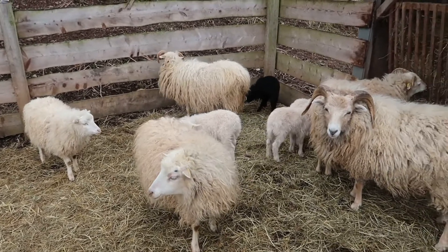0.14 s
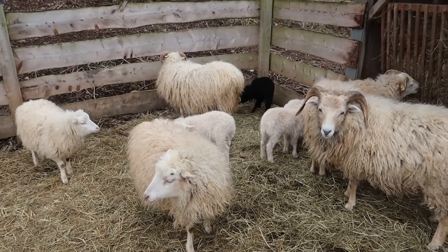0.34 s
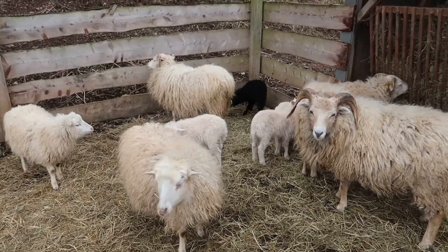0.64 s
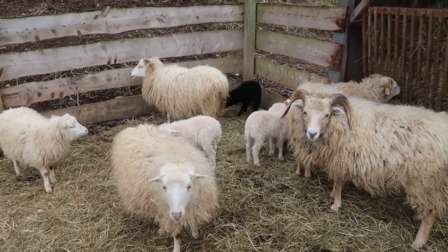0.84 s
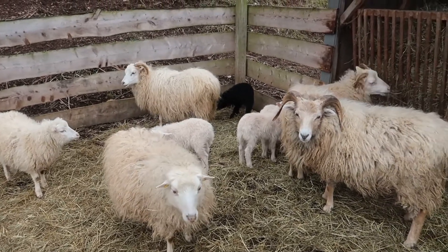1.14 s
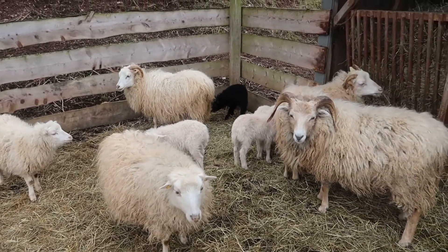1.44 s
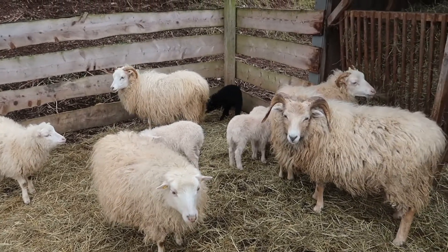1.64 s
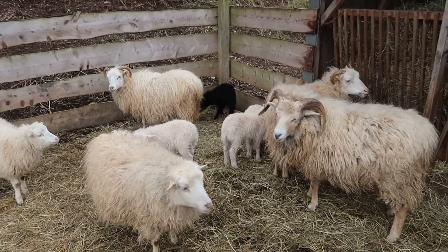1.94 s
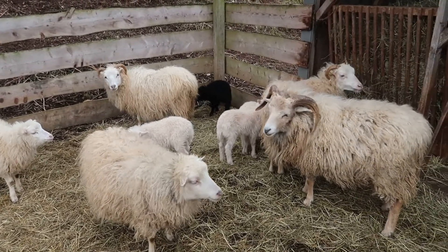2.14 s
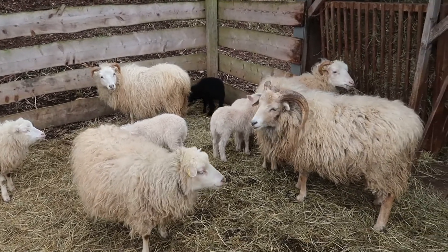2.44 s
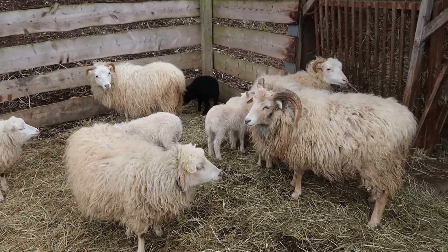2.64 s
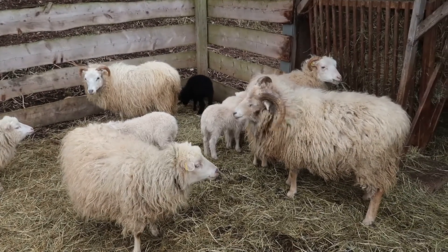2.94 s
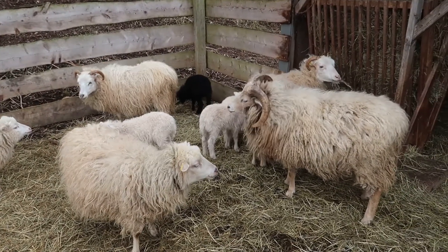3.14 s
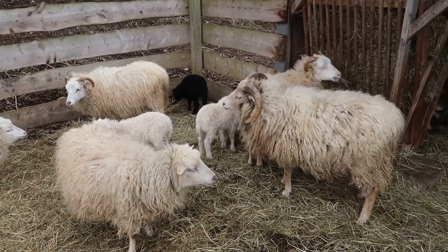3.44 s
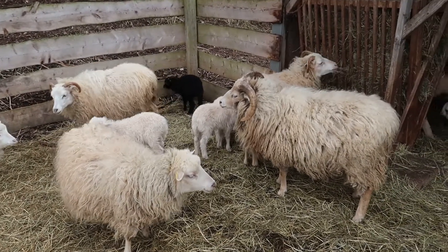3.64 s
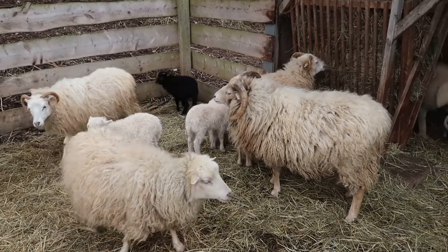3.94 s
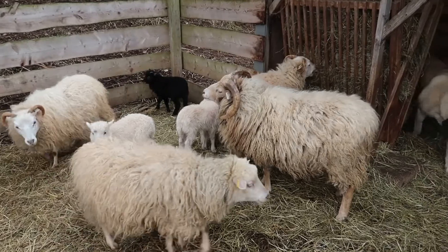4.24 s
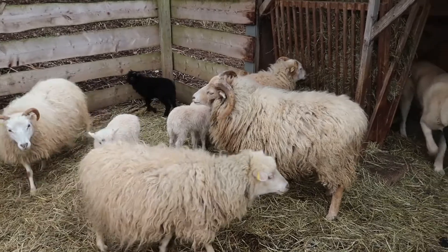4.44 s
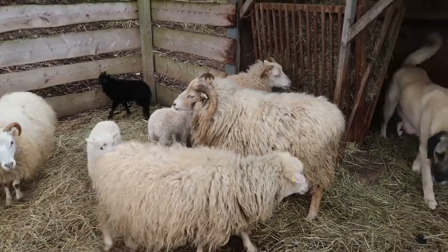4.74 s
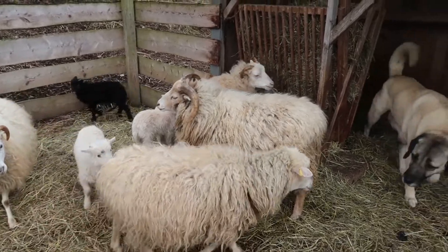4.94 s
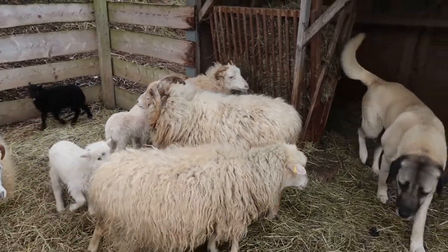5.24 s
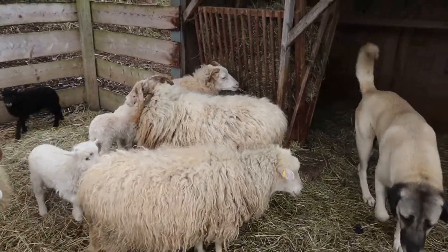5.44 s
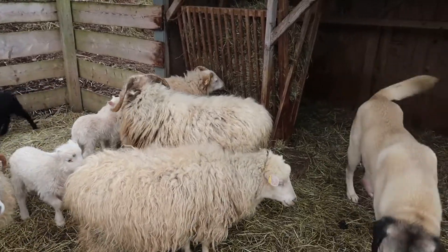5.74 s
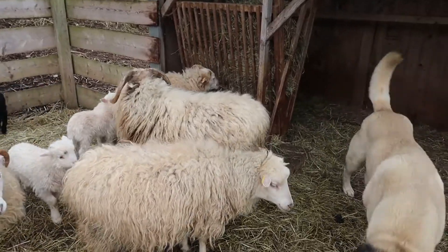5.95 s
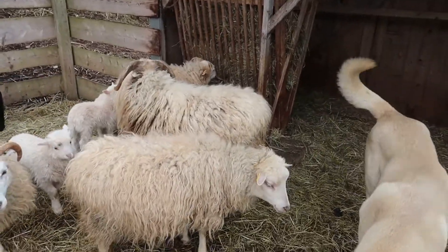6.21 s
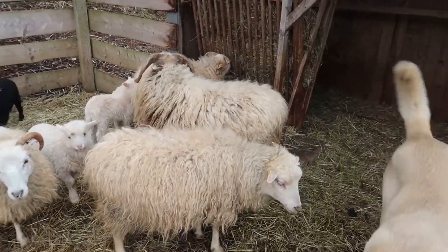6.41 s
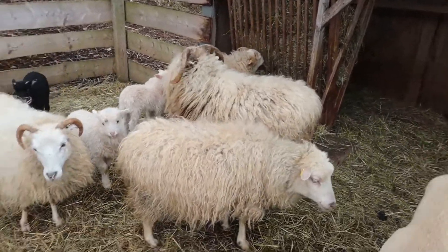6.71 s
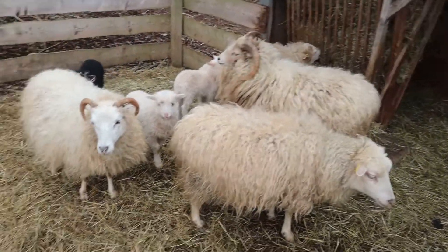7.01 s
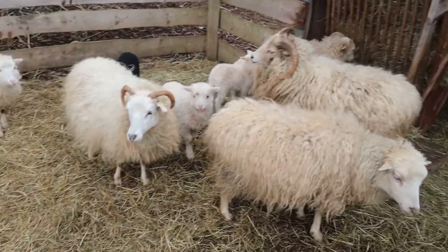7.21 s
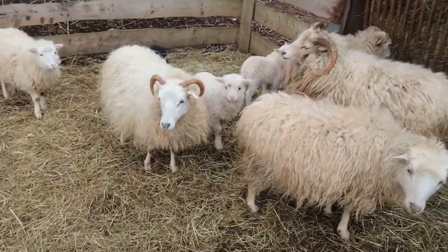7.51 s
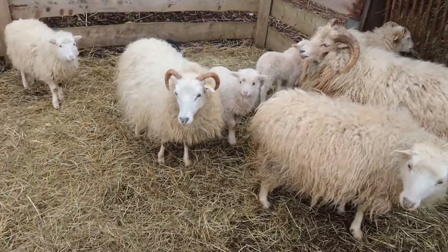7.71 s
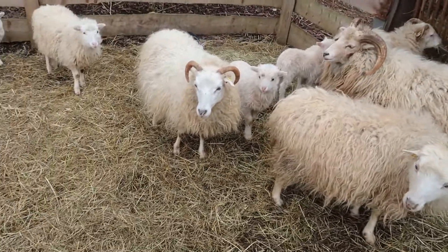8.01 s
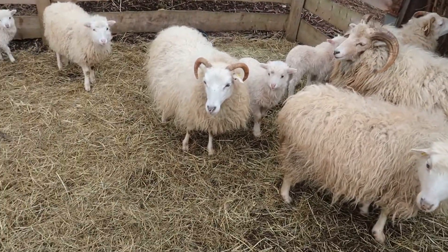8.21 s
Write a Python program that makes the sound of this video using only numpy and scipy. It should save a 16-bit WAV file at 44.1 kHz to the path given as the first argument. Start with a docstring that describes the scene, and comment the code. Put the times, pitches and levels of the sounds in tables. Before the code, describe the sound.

Quiet open-air farm ambience with twittering birds echoing from trees and faint, blurred sheep bleats far off. Straw crackles under shifting feet, more strongly in the second half. Soft short grunts come close together before the middle, then dull taps on planks. Near the end one sharp, very loud wooden knock strikes, then a rattling scrape and several smaller knocks. Stereo phone-like pickup near the flock, slight shed reflection.

```python
"""A plank sheep pen, heard through a phone's two microphone ports a few metres from the flock.
From the start: outdoor air and low rumble (shaped noise), straw rustle (spiky noise), chirps (gliding sines).
From 0.8 s birds whistle bent syllables from the trees and far bleats (filtered pulses) return as echoes;
from 1.4 s hooves knock the boards (ringing modes, scraping noise); near 3.5 s a ewe grunts softly (harmonics).
Song comes again from 6.2 s, and the hardest knock falls at 7.6 s."""
import sys
import numpy as np
from scipy import signal
from scipy.fft import rfft, irfft
from scipy.io import wavfile
from scipy.ndimage import uniform_filter1d

SR = 44100
rng = np.random.default_rng(int(sys.argv[2]) if len(sys.argv) > 2 else 0)


def unload_audio(sound):
    """Save the sound as a 16-bit wav file, at the path given as the first command line argument."""
    columns = np.transpose(np.atleast_2d(sound))
    # keep every value between -1 and 1, then stretch to whole-number steps
    steps = np.round(np.clip(columns, -1, 1) * 32767)
    wavfile.write(sys.argv[1], SR, steps.astype(np.int16))


def invert_db(level):
    """Linear amplitude ratio for a level in decibels (20 dB per decade), elementwise."""
    return 10 ** (np.asarray(level, dtype=float) / 20)


N = 369097
T = np.arange(N) / SR
LR = np.array([[1], [-1]])  # opposite signs, left and right

# outdoor air, middle of the image, relative spectrum: f/Hz, density/dB
AIR_SPECTRUM = [(15, -60), (25, -25), (53, -7), (118, -4.5), (142, -2.5), (257, -1), (427, -9), (475, -11),
                (1060, -15), (1500, -16.5), (1760, -18.5), (3540, -20), (11500, -35), (15000, -44)]
# outdoor air, side against middle: f/Hz, side minus mid/dB
AIR_WIDTH = [(60, -31), (110, -18.5), (200, -19.5), (380, -3.5), (700, -1.5), (1290, 0.5), (2380, 0.5),
             (4400, 2), (8120, 4.5), (15000, 13)]
# wind on the microphone: t/s, level/dB
WIND = [(0, -72), (.6, -62), (1.05, -64), (1.3, -61.5), (3.5, -71), (5, -71.5), (5.5, -60), (5.9, -50.5),
        (6.08, -54.5), (6.34, -52), (6.8, -54), (7.5, -52), (8.25, -51), (8.37, -46.5)]
# low rumble, relative spectrum: f/Hz, density/dB
RUMBLE_SPECTRUM = [(20, -51), (32, 4.5), (42, 6.5), (70, 8.5), (100, 2.5), (200, 1.0), (500, -57.0)]
# crisp stalks, relative spectrum: f/Hz, density/dB
STALKS = [(3000, -15), (5000, 0), (7000, 0), (11500, 0.5), (14000, -6), (15600, -11)]
# trodden bedding, relative spectrum: f/Hz, density/dB
BEDDING = [(700, -1.5), (1500, -4.5), (2500, -1.5), (4500, -3.5), (7000, -28.5)]
# general stir of the flock: t/s, relative shuffle level/dB, crispness (stalks above shuffle)/dB
STIR = [(0, -73.5, -7), (1.1, -68, -8.5), (2, -87, 6), (3.4, -69, -6.5), (4, -58.5, 0.5), (5.3, -63, 0.5),
        (5.8, -60, 1), (6.1, -63.5, 0), (6.9, -61, -19), (7.4, -53.5, -7), (7.7, -63.5, -11),
        (8.37, -58.5, -12)]
# single steps in the straw: t/s, relative level/dB, fade/s, crispness/dB
STEPS = [(1.05, -63, 0.093, 2), (2.03, -79.5, 0.074, 12.5), (2.54, -71, 0.15, 6.5),
         (3.5, -59.5, 0.023, 0.5), (3.68, -59.5, 0.061, -1), (3.94, -57.5, 0.024, 10), (4.54, -60, 0.22, 7),
         (4.99, -62, 0.12, 10), (5.6, -72, 0.11, -4), (5.97, -55, 0.026, 4.5), (6.29, -62, 0.072, 4),
         (6.64, -69, 0.018, 8), (6.81, -70.5, 0.084, 7.5), (7.22, -55.5, 0.05, -4), (7.53, -47, 0.059, -30),
         (7.58, -58, 0.024, 4.5), (7.74, -55.5, 0.095, -5), (8.062, -62, 0.02, 8), (8.248, -54, 0.027, 1)]
# short single chirps, among them lead-in and linking notes of the songs:
# t/s, level/dB, start f/Hz, end f/Hz, length/s
CHIRPS = [(.0, -51, 3080, 4320, 0.021), (0.116, -52.5, 3690, 3200, 0.023),
          (0.157, -56.5, 3080, 2400, 0.027), (.035, -56, 4700, 4070, 0.044), (.072, -55, 3190, 3550, 0.027),
          (0.225, -59, 4800, 5980, .05), (0.401, -54.5, 4040, 4500, 0.028), (.428, -55, 4550, 3400, .022),
          (.45, -53, 3350, 3800, 0.014), (0.544, -56.5, 5600, 6500, 0.028),
          (0.61, -54.5, 3600, 5600, 0.041), (0.663, -51, 5680, 6500, 0.018),
          (0.829, -50, 5940, 5300, 0.019), (.912, -49, 5650, 5260, .011), (.989, -49, 5900, 5300, 0.016),
          (.862, -51, 4680, 4000, .006), (1.106, -56, 5800, 5700, 0.014), (3.5, -58, 4100, 3900, .02),
          (3.749, -60, 4350, 4460, .028), (3.782, -55, 3900, 3750, .02), (3.915, -52, 3900, 4050, .016),
          (4.094, -56, 3050, 3200, 0.014), (7.38, -48, 3000, 2450, .02), (7.553, -44, 3660, 3500, .01),
          (0.676, -50, 4810, 4350, 0.024), (.768, -51, 3700, 5000, 0.016), (0.703, -52, 2750, 3050, 0.009),
          (0.748, -51.5, 3370, 2760, 0.036), (0.76, -52, 6100, 5300, 0.02),
          (1.017, -48.5, 3150, 3900, 0.015), (.74, -60, 4900, 4600, .02), (1.08, -50, 4310, 3930, 0.023),
          (1.095, -56, 4040, 3550, .01), (1.58, -57, 4620, 3110, 0.061), (1.616, -54, 3070, 3600, 0.015),
          (2.506, -56, 4560, 3950, 0.037), (3.16, -57, 2970, 2310, .031), (4.15, -54, 5900, 3970, 0.023),
          (4.288, -48, 5300, 3900, 0.0162), (4.359, -52.5, 4900, 3420, 0.032),
          (4.748, -47, 3900, 2600, 0.02), (4.772, -52, 3720, 2810, 0.019), (4.793, -51, 2240, 2300, .015),
          (4.86, -51, 3020, 4640, .022), (4.877, -49, 4600, 3720, 0.024), (4.939, -50, 3560, 3150, 0.027),
          (6.45, -47.5, 5250, 5170, 0.022), (6.492, -50, 5240, 5200, .03), (6.542, -51, 5580, 5400, 0.042),
          (7.2, -46.5, 4540, 4470, 0.024), (7.256, -50, 4510, 5330, 0.043), (7.277, -45, 3300, 2750, 0.013),
          (7.289, -48, 3700, 3550, 0.018), (7.38, -52, 3310, 2440, 0.033), (7.41, -63, 3260, 2330, .035),
          (7.4, -51, 4200, 3700, .02), (7.462, -50, 2900, 2400, .02), (7.493, -48.5, 4400, 4600, 0.016),
          (7.522, -46, 3800, 2710, .039), (7.538, -50, 4570, 4450, 0.024)]

# rising tick, shape: t/s, f/Hz, level/dB
TICK = [(0, 5250, -4), (.01, 5440, 0), (.022, 5750, -5)]
# when it is sung: t/s, level/dB, pitch factor
TICK_TIMES = [(2.614, -57, 1.06), (2.78, -51, 1.02), (2.932, -49.5, 1), (3.08, -50, 1.02),
              (3.222, -50, 0.95), (3.367, -50, 1.05)]
# arch, up and down, shape: t/s, f/Hz, level/dB
ARCH = [(0, 3700, -8), (.012, 4400, -4), (.022, 6150, -9), (.032, 4250, -6), (.042, 3700, -1),
        (.06, 3350, 0), (.08, 3200, -8)]
# when it is sung: t/s, level/dB, pitch factor
ARCH_TIMES = [(2.638, -50, 1.06), (2.799, -48, 1.07), (2.949, -46, 1.02), (3.096, -46, 0.96),
              (3.24, -41.5, .98), (3.379, -43.5, 0.94)]
# trill note, shape: t/s, f/Hz, level/dB
TRILL = [(0, 3150, 0), (.008, 2650, -5), (.018, 2100, -13), (.022, 2400, -20), (.024, 2900, -5),
         (.027, 3250, 0), (.038, 3450, -4), (.043, 3350, -18), (.049, 3300, -1), (.058, 3200, -12)]
# when it is sung: t/s, level/dB, pitch factor
TRILL_TIMES = [(3.485, -43, 0.96), (3.556, -43, 0.99), (3.631, -42, 0.98), (3.702, -42, 0.95),
               (3.778, -41.5, 0.96), (3.853, -44.5, 0.97)]
# broken falling note, shape: t/s, f/Hz, level/dB
FALL = [(0, 5450, -12), (.01, 4800, -2), (.02, 3380, -8), (.025, 2990, -20), (.029, 3490, -3),
        (.048, 2846, -5.5), (.056, 2400, -22), (.07, 2806, -6), (.078, 3030, -12), (.082, 4080, -3),
        (.1, 2800, -10.5), (.14, 2080, -17)]
# when it is sung: t/s, level/dB, pitch factor
FALL_TIMES = [(3.943, -37, 1)]
# hooked note, shape: t/s, f/Hz, level/dB
HOOK = [(0, 2050, -12), (.012, 2650, -9), (.022, 3250, 0), (.032, 2900, -4), (.036, 2900, -22),
        (.042, 3100, -8), (.052, 2900, -14)]
# when it is sung: t/s, level/dB, pitch factor
HOOK_TIMES = [(4.197, -40.5, 0.96), (4.32, -40, 0.96)]
# note that rises and drops back, shape: t/s, f/Hz, level/dB
RISE = [(0, 3750, -14), (.007, 4150, -7), (.011, 4500, 0), (.015, 5300, -6), (.017, 5500, -30),
        (.021, 5100, -11), (.026, 4500, -6), (.03, 4400, -14)]
# when it is sung: t/s, level/dB, pitch factor
RISE_TIMES = [(0.841, -45.5, 0.93), (.917, -44.5, .9), (.999, -44.5, 0.93), (1.158, -47, 0.96),
              (6.234, -38, 1), (6.31, -40, 1.04), (6.385, -42, 1.02), (6.467, -38.5, 0.99),
              (6.545, -42, 1.06)]
# V-shaped note, down and up, shape: t/s, f/Hz, level/dB
VEE = [(0, 5600, -10), (.012, 5250, -11), (.016, 4800, -18), (.019, 4350, -4), (.031, 3650, -1),
       (.045, 3200, 0), (.05, 3050, -20), (.057, 3500, -22), (.061, 3850, 0), (.067, 4350, -2),
       (.076, 5200, -15)]
# when it is sung: t/s, level/dB, pitch factor, length factor
VEE_TIMES = [(1.238, -44, 1, 0.65), (1.363, -45, 1, 0.67), (1.499, -45.5, 1, 0.59),
             (6.611, -41, 1.02, 0.93), (6.749, -38.5, 1.015, 0.77), (6.869, -40, 1.03, 0.83),
             (6.998, -40, 1.02, .8), (7.122, -41.5, 1.03, 0.6), (7.245, -48.5, 1.03, .72)]

# far bleats: t/s, length before the release/s, level/dB
FAR_BLEATS = [(0.865, 0.57, -61), (2.2, 0.4, -63.5), (3.518, 0.39, -60.5), (6.072, 0.42, -59)]
# ringing modes of a plank: f/Hz, level/dB, t60/s
PLANK = [(103.5, -12.5, 0.36), (181, -16.5, 0.14), (240, -17.5, 0.2), (279.3, -21.5, 0.24),
         (340, -12, 0.08), (398, -14, 0.08), (449.7, -9, 0.12), (662, -9, 0.057), (833, -17, 0.07),
         (1040, -19, 0.061), (1346, -21.5, 0.054), (1544, -19.5, 0.046)]
# knocks on the planks: t/s, blow level/dB, struck spot f/Hz, spot level/dB
KNOCKS = [(1.364, -41, 157, -65), (3.721, -41, 463, -39), (5.444, -52, 217, -43.5), (5.638, -46, 193, -46),
          (5.76, -47, 153, -52), (5.85, -41, 240, -53), (5.92, -36.5, 130, -43.5), (5.955, -42, 140, -45),
          (6.015, -42, 130, -44), (6.134, -37, 300, -45), (6.402, -34, 300, -53), (6.446, -49, 516, -42),
          (7.312, -35, 1220, -40), (7.568, -42, 520, -31), (7.6235, -8.5, 562, -12.5),
          (7.6345, -32, 480, -21), (7.647, -15, 378, -25), (7.664, -32, 480, -30), (7.684, -27, 169, -31.5),
          (7.77, -49, 790, -45), (7.845, -40, 1275, -36), (8.103, -27.5, 111, -25.5),
          (8.134, -41, 525, -21.5), (8.147, -21.5, 323, -23.5), (8.155, -24, 186, -26.5),
          (8.166, -21.5, 307, -25), (8.182, -30, 250, -36), (8.214, -53, 384, -40)]
# hooves scraping along the planks: t/s, fade after the peak/s, relative level/dB
SCRAPES = [(6.128, 0.021, -47), (6.446, 0.014, -48), (7.313, 0.02, -39), (7.567, 0.012, -33.5),
           (7.623, 0.024, -34.5), (7.645, 0.052, -41), (7.849, 0.0022, -33), (8.104, 0.017, -48),
           (8.141, 0.039, -22), (8.209, 0.043, -34.5)]
# crunch of a scrape: f/Hz, gain/dB
CRUNCH = [(60, -44), (150, 17.0), (500, 5.0), (1000, 1), (2200, 1.0), (3400, -14), (7000, -19), (12000, -65)]
# soft grunts of a ewe: t/s, length/s, pitch at full effort f/Hz, level/dB, mouth resonance f/Hz
GRUNTS = [(3.498, 0.021, 268, -41.5, 270), (3.6, 0.038, 238, -39, 483), (3.683, 0.04, 255.6, -34.5, 520),
          (3.808, 0.027, 217, -48, 240)]
# throat resonances: f/Hz, half-width/Hz, level against the mouth/dB
THROAT = [(760, 130, -41), (1515, 240, -35), (1780, 63, -19)]


def level(x, db):
    """Scale to an rms level."""
    return x * invert_db(db) / np.sqrt(np.mean(x ** 2))


def colour(x, points):
    """Shape a spectrum by (f/Hz, gain/dB) points, joined along log frequency."""
    hz, db = np.transpose(points)
    length = x.shape[-1]
    f = np.maximum(np.arange(length // 2 + 1) * SR / length, 1)
    gain = invert_db(np.interp(np.log(f), np.log(hz), db))
    return irfft(rfft(x) * gain, length)


def band(x, hz, width_hz):
    """One resonance, gain 1 at its centre."""
    return signal.lfilter(*signal.iirpeak(hz, hz / width_hz, SR), x)


def walk(rate):
    """Random levels held 1 / rate s and slewed twice; spread near 1."""
    k = int(SR / rate)
    held = np.repeat(rng.standard_normal(N // k + 1), k)
    return 0.82 * uniform_filter1d(uniform_filter1d(held, k), k)[:N]


def add(out, s, x):
    """Mix x in from time s."""
    i = int(s * SR)
    out[i:i + len(x)] += x[:N - i]


def ports(x, lag_s):
    """The two microphone ports hear a source from the side a little apart: left lags right by lag_s."""
    f = np.arange(N // 2 + 1) * SR / N
    turn = np.exp(-1j * np.pi * f * lag_s * LR)
    return irfft(rfft(x) * turn, N)


def echoes(x, t60_s, gap_s, patchy_db=0.):
    """A diffuse tail, unrelated in the two channels, with the energy of the direct sound."""
    t = T[:SR // 2]
    tail = rng.standard_normal((2, len(t))) * invert_db(-60 * t / t60_s) * (t > gap_s)
    # trunks and walls stand out as single reflections
    tail *= invert_db(patchy_db * rng.exponential(size=tail.shape))
    tail /= np.sqrt(np.sum(tail ** 2, 1, keepdims=True))
    return signal.fftconvolve(x[None], tail, axes=1)[:, :N]


def air():
    """Outdoor wash whose bass and treble flicker separately; the bass is alike left and right."""
    mid, side = colour(rng.standard_normal((2, N)), AIR_SPECTRUM)
    both = level(mid + colour(side, AIR_WIDTH) * LR, -52)
    low = signal.sosfiltfilt(signal.butter(2, 500, fs=SR, output="sos"), both)
    high = both - low
    return low * invert_db(2.0 * walk(14)) + high * invert_db(1.8 * walk(6.5))


def rumble():
    """Wind and trampling shake the bass: low noise whose level follows the gusts."""
    gust_db, gusts_per_s = 2, 9
    wind_db = np.interp(T, *np.transpose(WIND)) + gust_db * walk(gusts_per_s)
    return level(colour(rng.standard_normal(N), RUMBLE_SPECTRUM), 0) * invert_db(wind_db)


def rustle_levels():
    """Relative dB of crisp and dull rustle: the general stir plus single steps that swell and fade."""
    rise_share = 0.72  # swelling time over fading time
    s, db, crisp_db = np.transpose(STIR)
    dull = invert_db(np.interp(T, s, db))
    crisp = invert_db(np.interp(T, s, db + crisp_db))
    for s, db, fade, crisp_db in STEPS:
        step = invert_db(db) * np.exp(-np.maximum((T - s) / fade, (s - T) / (rise_share * fade)))
        dull = np.hypot(dull, step)
        crisp = np.hypot(crisp, invert_db(crisp_db) * step)
    return 20 * np.log10(crisp), 20 * np.log10(dull)


def straw():
    """Dense crackles of dry stalks from several sides: a crisp top and a dull shuffle."""
    crisp_db, dull_db = rustle_levels()
    grains = rng.standard_normal((4, N)) * invert_db(2.0 * rng.exponential(size=(4, N)))
    # grain stream 1 is shared by both layers
    crisp = colour(0.84 * ports(grains[0], 3.5e-5) + 0.4 * grains[1] + 0.56 * grains[2] * LR, STALKS)
    dull = colour(grains[3] + 0.51 * grains[1] * LR, BEDDING)
    crisp *= invert_db(crisp_db + 3.5 * walk(20)) / crisp.std()
    dull = invert_db(dull_db + 3.8 * walk(40)) * level(dull, 3.15)
    return 1.84 * crisp + dull


def whistle(s, hz, db):
    """A near-sine note along t/s, f/Hz, level/dB points, with soft ends."""
    t = T[:int(s[-1] * SR)]
    phase = 2 * np.pi * np.cumsum(np.interp(t, s, hz)) / SR
    return signal.windows.tukey(len(t), .3) * invert_db(np.interp(t, s, db)) * np.sin(phase)


def chirps():
    """Single bent notes, with faint random ones, made gritty by a fast flutter."""
    bow_per_s, flat_glide = 5.05, .08  # notes that hardly glide arch upward, the longer the more
    out = np.zeros(N)
    faint = [(a * T[-1], -67 + 5 * b, 3900 * (.8 + .6 * c), 3900 * (.7 + .5 * c), .02 + .03 * d)
             for a, b, c, d in rng.random((40, 4))]
    for start, db, first, last, length in CHIRPS + faint:
        bow = bow_per_s * length * np.exp(-(np.log(last / first) / flat_glide) ** 2)
        middle = np.sqrt(first * last) * (1 + bow)
        note = whistle(length * np.arange(3) / 2, [first, middle, last], db - np.array([6, 0, 6]))
        add(out, start, note)
    return out * invert_db(5.0 * walk(500))


def birds(parts):
    """Syllables sung from their shapes; leaves and moving air make the level flutter."""
    out = np.zeros(N)
    for shape, sung in parts:
        s, hz, shape_db = np.transpose(shape)
        for start, db, pitch, *length in sung:  # no length factor: the product is 1
            add(out, start, whistle(s * np.prod(length), pitch * hz, db + shape_db))
    return out * invert_db(3.5 * walk(400))


def far_bleats():
    """Rough quavering pulses, smeared by distance into one resonance."""
    attack_s, release_s = 0.038, 0.18
    phase = np.cumsum(250 * (1 + 0.053 * walk(20))) / SR
    voice = np.diff(np.floor(phase), prepend=0) + 0.055 * rng.standard_normal(N)
    voice = band(band(voice, 1500., 420.), 1500., 420.)
    voice = level(voice, 0) * invert_db(2 * walk(12))
    swell = np.zeros(N)
    for s, length, db in FAR_BLEATS:
        rise, fall = (T - s) / attack_s, 1 + (s + length - T) / release_s
        swell += invert_db(db) * np.clip(np.minimum(rise, fall), 0, 1)
    return voice * swell


def plank_ring():
    """Impulse response of a plank: modes that build over some cycles, then decay."""
    bloom_cycles = 1.76
    t = T[:SR // 2]
    ring = np.zeros(len(t))
    for k, (hz, db, t60) in enumerate(PLANK):
        build = 1 - np.exp(-hz * t / bloom_cycles)
        # neighbouring modes start in opposite directions
        ring += (-1) ** k * invert_db(db - 60 * t / t60) * build * np.sin(2 * np.pi * hz * t)
    return ring


def knocks():
    """A blow rings the struck spot for a few cycles and the plank longer; a scrape rattles and hisses."""
    push_s, softer_s_per_db = .0003, .00004  # weaker blows are softer and push longer
    spot_cycles = 1.3  # cycles to the spot's peak
    force, spots, grit = np.zeros(N), np.zeros(N), np.zeros(N)
    for s, blow_db, hz, spot_db in KNOCKS:
        push = np.hanning(int((push_s - softer_s_per_db * blow_db) * SR))
        add(force, s, invert_db(blow_db) * push / push.sum())
        cycles = hz * T[:SR // 10]
        swell = (cycles / spot_cycles * np.exp(1 - cycles / spot_cycles)) ** 0.79
        add(spots, s, invert_db(spot_db) * np.sin(2 * np.pi * cycles) * swell)
    for s, fade, db in SCRAPES:
        # the hump enters already part-way up
        add(grit, s, invert_db(db) * np.hanning(int(fade * SR * 2))[int(fade * SR * .6):])
    uneven_db = 2.5 * (rng.exponential(size=N) + walk(300))
    scrape = grit * level(rng.standard_normal(N) * invert_db(uneven_db), 0)
    ring = signal.fftconvolve(force + 0.036 * scrape, plank_ring())[:N]
    sound = ring + spots + colour(scrape, CRUNCH)
    # little of the knocks is heard below 75 Hz
    return signal.sosfilt(signal.butter(3, 75, "high", fs=SR, output="sos"), sound)


def grunts():
    """Wavering glottal harmonics under a mouth resonance and fixed throat resonances; pitch follows effort."""
    edge_share = 0.58  # share of the length spent swelling and fading
    slack, jitter = 0.12, .03  # shares of the pitch: drop when effort is low, waver
    out = np.zeros(N)
    wavers = walk(201)[:SR].reshape(-1, SR // 10)
    for (s, length, hz, db, mouth), waver in zip(GRUNTS, wavers):
        effort = signal.windows.tukey(int(length * SR), edge_share)
        pitch = hz * (1 - slack * (1 - effort) + jitter * waver[:len(effort)])
        partial = np.arange(1, 9)[:, None] * pitch
        gain = 1 / (1 + ((partial - mouth) / 130) ** 2)
        for f, half_width, throat_db in THROAT:
            gain = gain + invert_db(throat_db) / (1 + ((partial - f) / half_width) ** 2)
        harmonics = gain * np.sin(2 * np.pi * np.cumsum(partial, 1) / SR)
        add(out, s, effort * invert_db(db) * np.sum(harmonics, 0))
    return out


def scene():
    """All sources with their echoes; the far bleats arrive as echoes only."""
    near = birds([(TICK, TICK_TIMES), (ARCH, ARCH_TIMES), (TRILL, TRILL_TIMES), (FALL, FALL_TIMES),
                  (HOOK, HOOK_TIMES)])
    other = birds([(RISE, RISE_TIMES), (VEE, VEE_TIMES)]) + chirps()
    pen = knocks() + grunts()
    woods_t60_s, shed_t60_s = .5, 0.26
    trees = invert_db(-1) * echoes(.8 * near + 1.25 * other, woods_t60_s, .012, patchy_db=4.5)
    trees += echoes(far_bleats(), woods_t60_s, .001)
    # the shed's return is nearly alike at both ports
    shed = echoes(pen, shed_t60_s, 0.012)
    shed = invert_db(-13.5) * (shed[0] + 0.14 * shed[1] * LR)
    direct = ports(near, 3e-5) + ports(other, -0.000044) + ports(pen, 2e-5)
    return direct + trees + shed + straw() + air() + rumble()


def top_cut(x):
    """Nothing passes above the cut-off."""
    return signal.sosfilt(signal.butter(12, 15710, fs=SR, output="sos"), x)


def record(dry):
    """The phone takes the two port signals as they are."""
    return top_cut(dry)


dry = scene()
out = record(dry)
unload_audio(out)
```